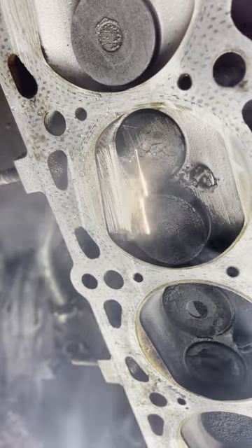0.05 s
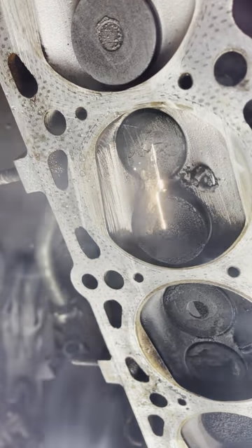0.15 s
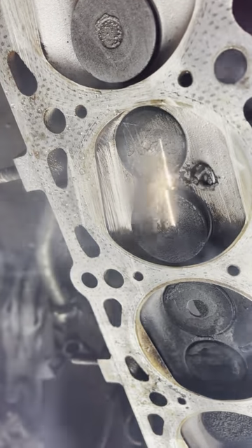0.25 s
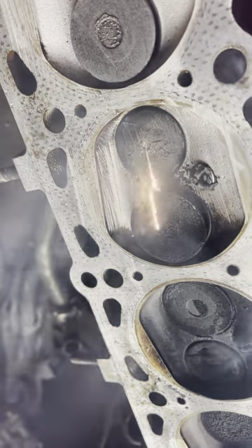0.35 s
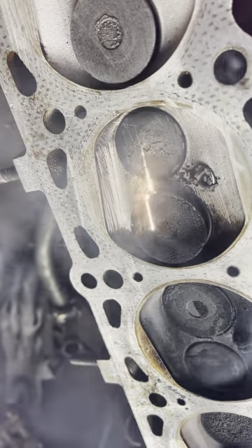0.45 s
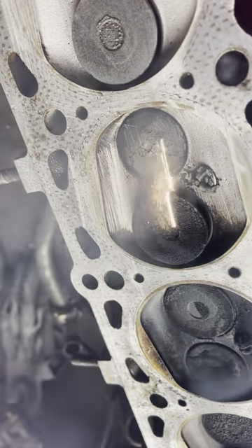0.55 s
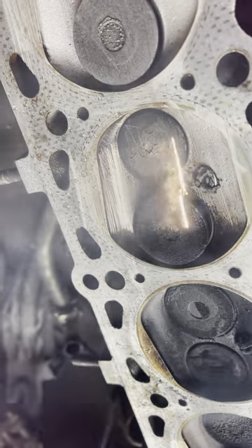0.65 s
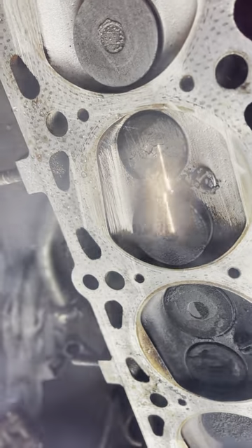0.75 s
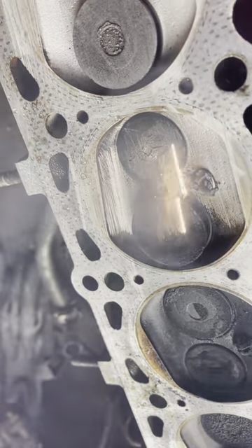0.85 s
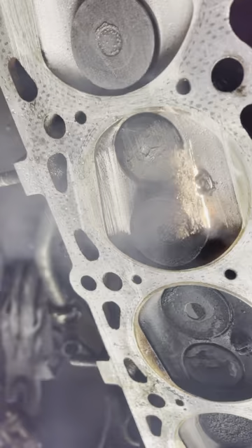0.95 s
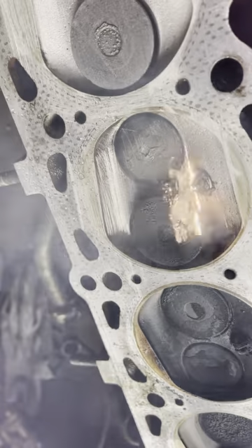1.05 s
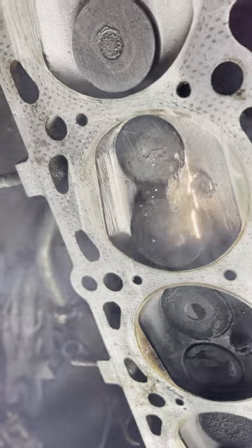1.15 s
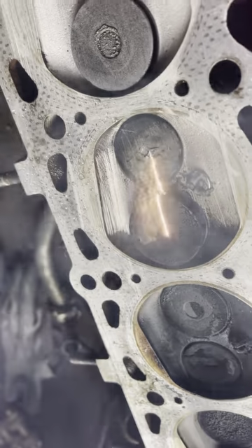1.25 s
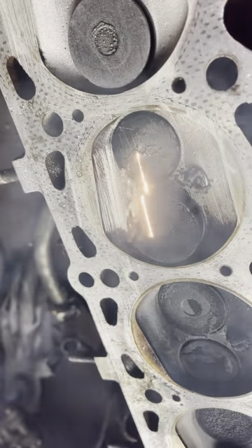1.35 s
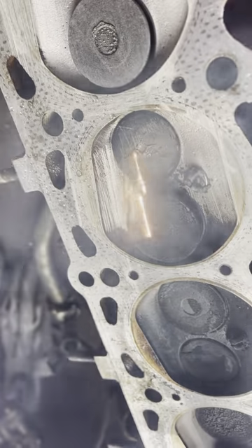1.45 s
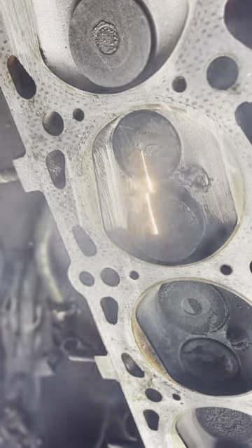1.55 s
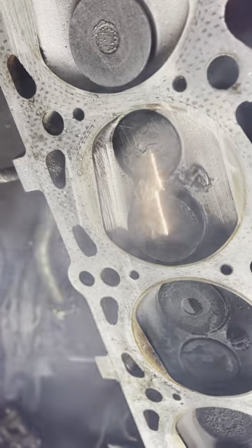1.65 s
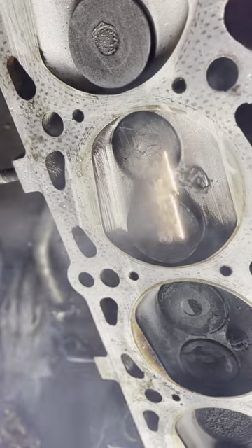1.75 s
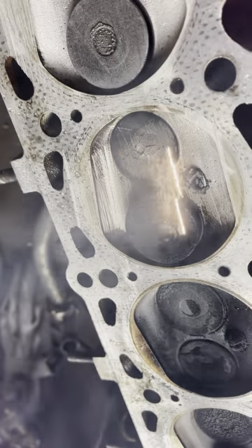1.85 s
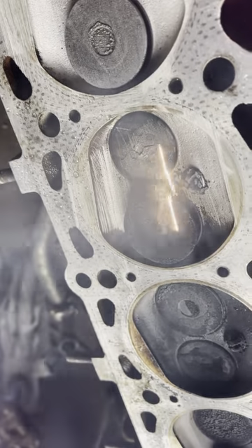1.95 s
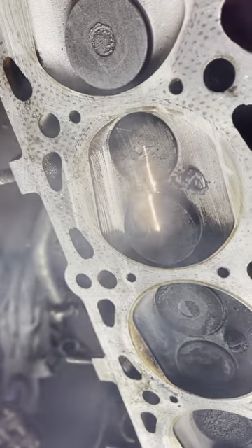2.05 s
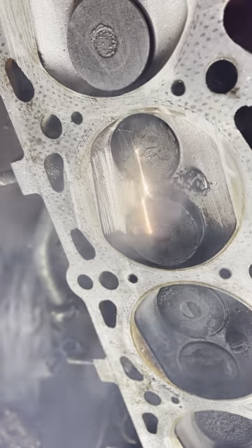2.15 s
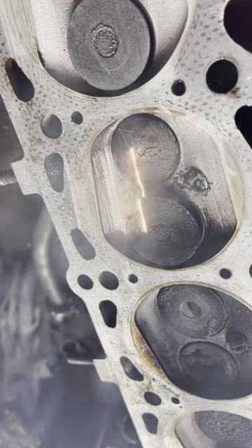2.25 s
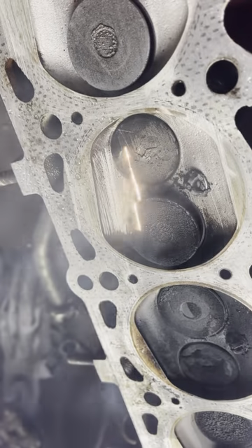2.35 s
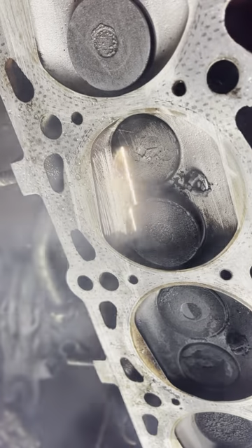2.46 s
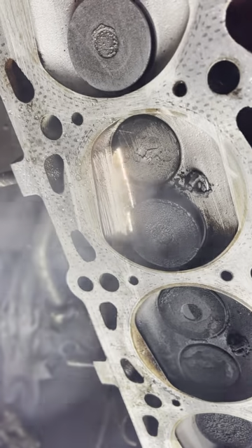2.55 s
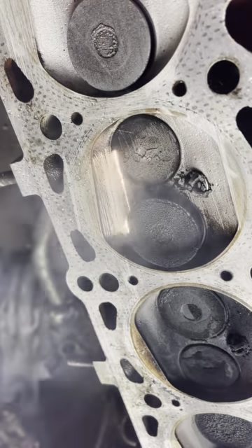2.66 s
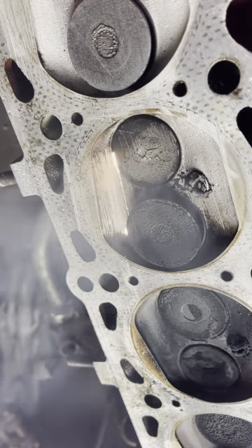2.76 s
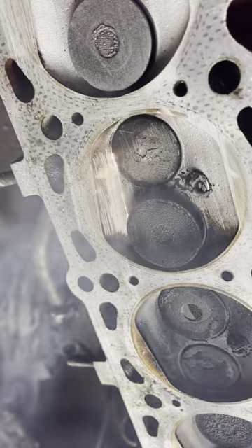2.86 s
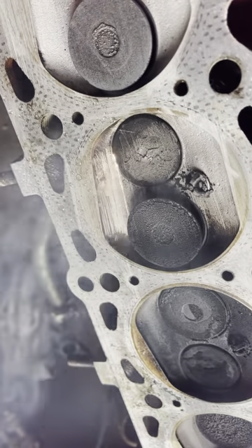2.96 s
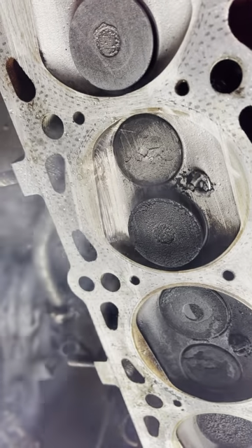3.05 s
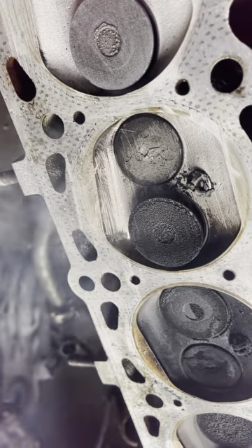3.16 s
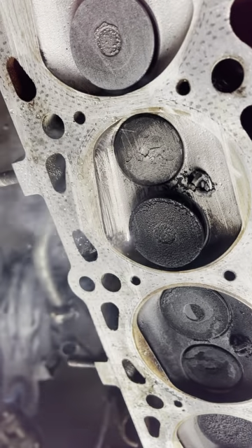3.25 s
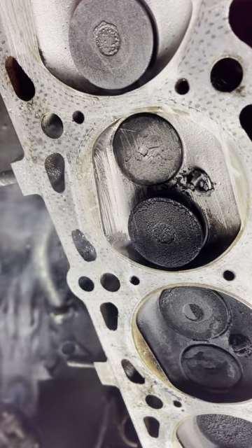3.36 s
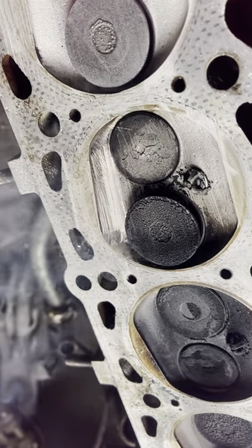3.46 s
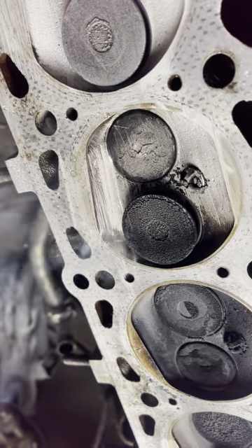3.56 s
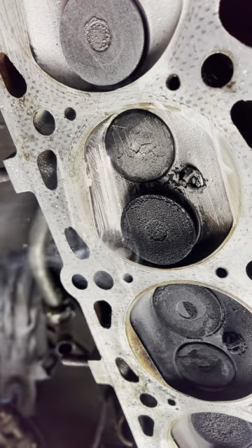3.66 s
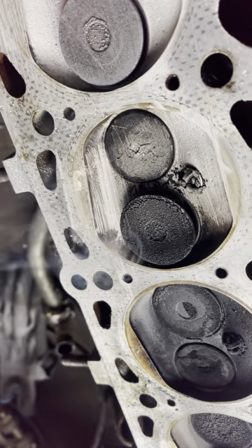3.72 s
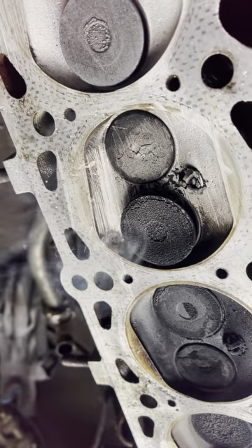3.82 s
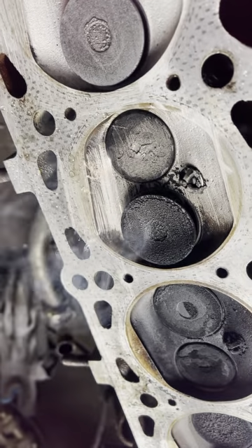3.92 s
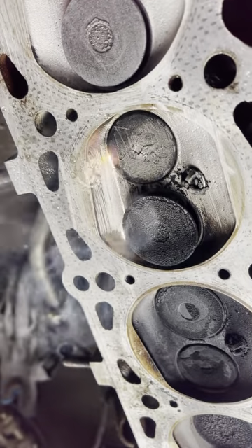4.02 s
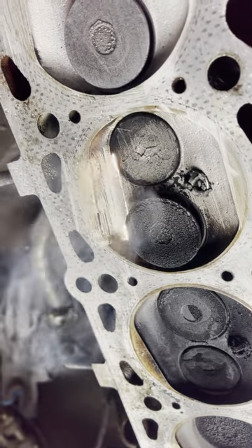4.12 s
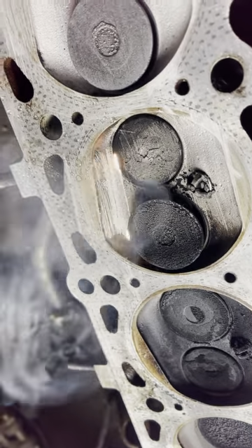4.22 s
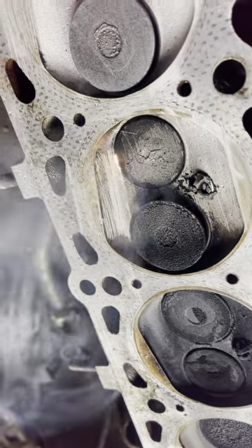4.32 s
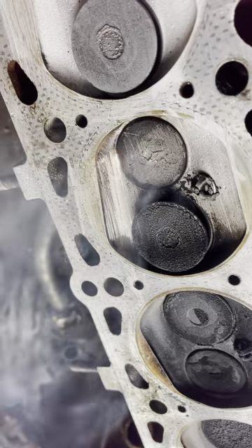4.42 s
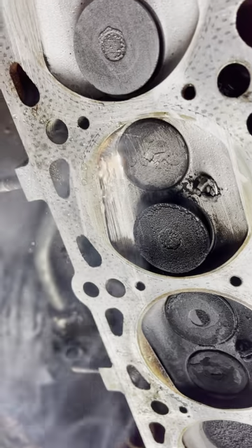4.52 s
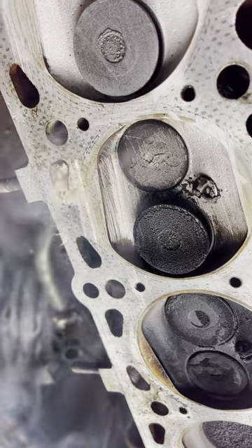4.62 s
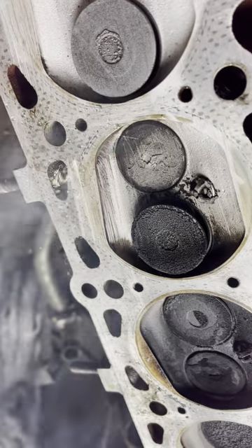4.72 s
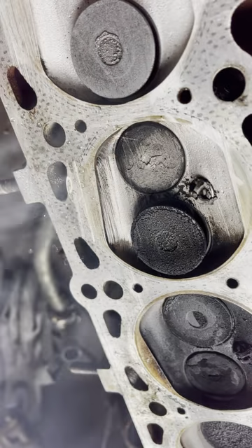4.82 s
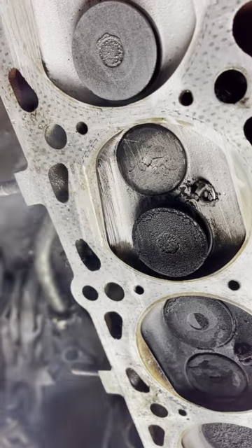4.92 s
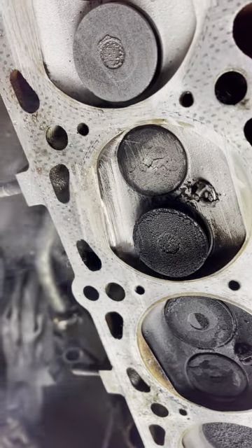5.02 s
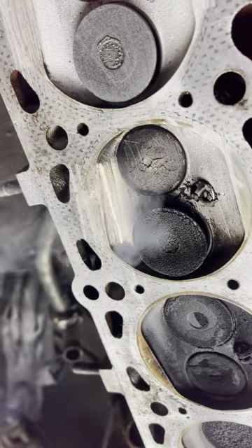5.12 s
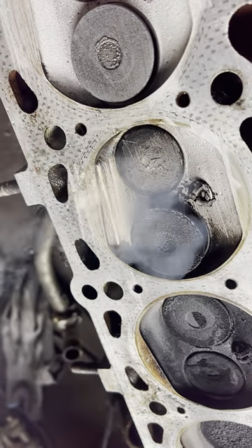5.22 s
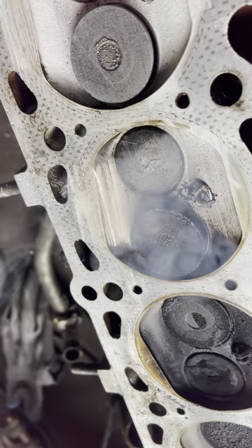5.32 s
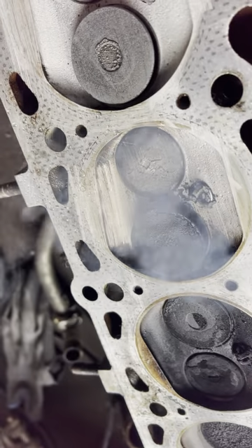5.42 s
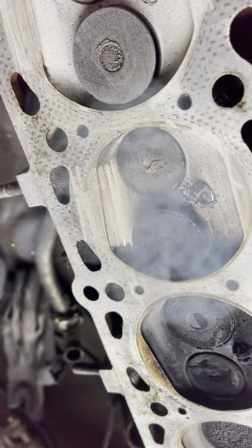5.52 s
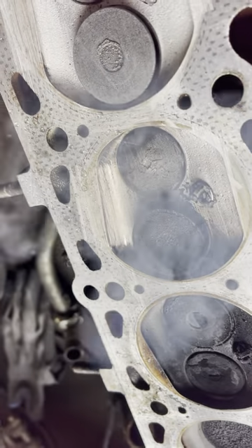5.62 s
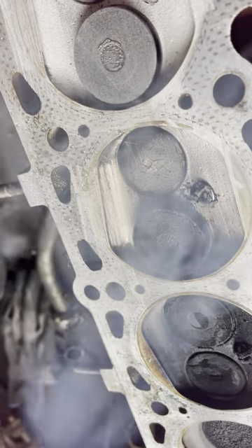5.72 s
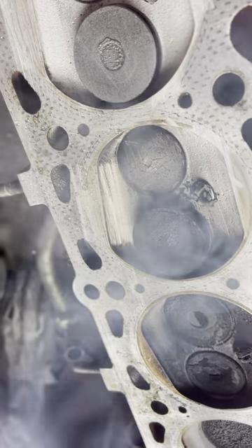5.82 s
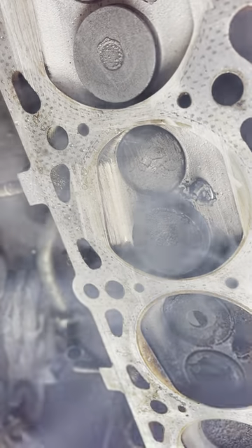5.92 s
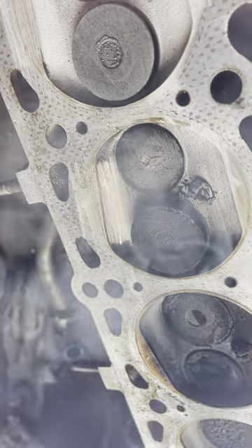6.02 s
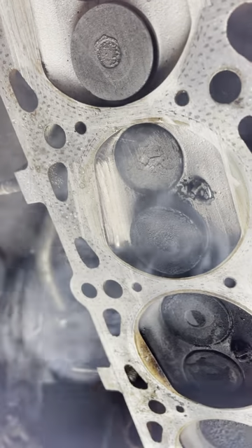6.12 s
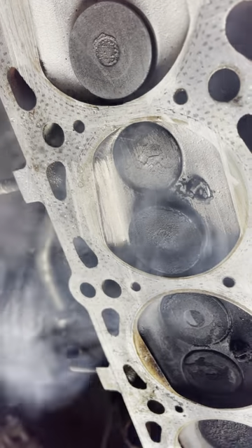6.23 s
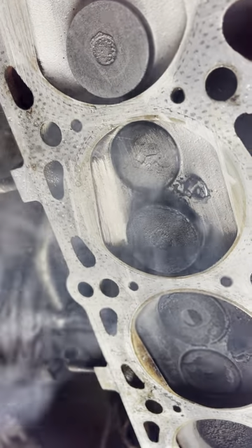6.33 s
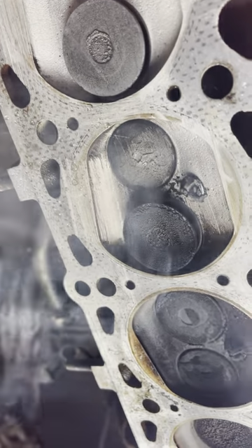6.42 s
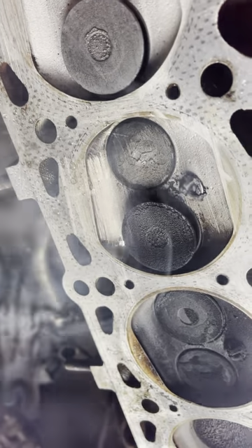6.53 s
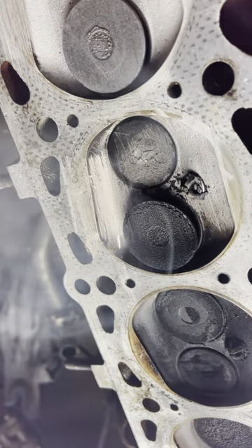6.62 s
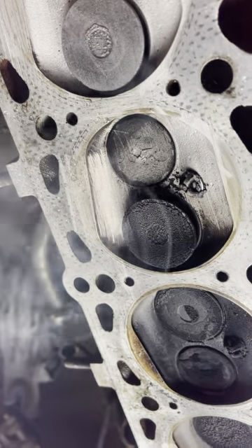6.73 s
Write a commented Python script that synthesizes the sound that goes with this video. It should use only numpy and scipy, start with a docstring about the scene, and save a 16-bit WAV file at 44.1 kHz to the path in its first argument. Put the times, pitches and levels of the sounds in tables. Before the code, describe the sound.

Harsh, continuous zapping sizzle, its high whine around ten kilohertz fluttering and briefly dipping, with a steady fast buzz underneath. It thins out near three seconds, then returns in irregular buzzing spurts, strongest a little after four seconds, followed by scattered sharp cracks and splutters over weak fizz. Close stereo microphone, tight metallic reflections, short workshop echo, very soft background rush and stirred air.

```python
"""Sizzle, whine and a buzz of snaps, close by: a pulsed laser burns carbon off an aluminium cylinder head.
A mirror sweeps the beam up and down a line 57 times a second. For three seconds an unbroken coat burns in
spurts of filtered noise; then nearly bare metal flares up on leftover patches, with single sharp cracks.
Where the line turns on carbon, a puff and a crackle snap once a sweep, which makes the buzz.
Behind lie metal and workshop echoes, a faint short tone, stirred air and a low rush."""
import sys
import numpy as np
from scipy import signal
from scipy.fft import rfft, irfft, next_fast_len
from scipy.io import wavfile
from scipy.ndimage import uniform_filter1d, map_coordinates

SR = 44100
rng = np.random.default_rng(int(sys.argv[2]) if len(sys.argv) > 2 else 0)


def waveform_to_disk(signal):
    """Save audio, clipped to [-1, 1], as 16-bit WAV at the path in sys.argv[1]."""
    frames = np.transpose(np.atleast_2d(signal))
    scaled = np.clip(frames, -1, 1) * 32767
    samples = np.round(scaled).astype(np.int16)
    wavfile.write(sys.argv[1], SR, samples)


N = 298998


def amp(db):
    """Decibels to gain."""
    return 10 ** (np.asarray(db) / 20)


def unit(x):
    """Scale to rms 1."""
    return x / np.sqrt(np.mean(x ** 2) + 1e-20)


def along(points, hz):
    """(Hz, value) points read on a log frequency axis."""
    point_hz, value = np.transpose(points)
    return np.interp(np.log(hz + 1), np.log(point_hz + 1), value)


def curves(rows):
    """One value per sample for each column after the time."""
    s, *columns = np.transpose(rows)
    return [np.interp(np.arange(N) / SR, s, column) for column in columns]


def wobble(rate):
    """A smooth random curve, rate knots a second."""
    knots = rng.standard_normal(int(N * rate / SR) + 4)
    return map_coordinates(knots, [np.arange(N) * rate / SR])


def spell(start_s, length_s, rise_s, fall_s):
    """Envelope that rises exponentially to 1 at the start, holds for its length, and dies away."""
    t = np.arange(N) / SR
    before = np.maximum(start_s - t, 0) / rise_s
    after = np.maximum(t - start_s - length_s, 0) / fall_s
    return np.exp(-np.minimum(before + after, 20))


def filtered(x, response):
    """x through a complex response of frequency."""
    m = 2 * next_fast_len(N // 2 + SR // 4)
    return irfft(rfft(x, m) * response(np.fft.rfftfreq(m, 1 / SR)), m)[..., :N]


def causal(gain):
    """The response with this gain that rings only after it is struck."""
    cepstrum = irfft(np.log(np.maximum(gain, 1e-6)))
    half = len(cepstrum) // 2
    return np.exp(rfft(np.r_[cepstrum[0], 2 * cepstrum[1:half], np.zeros(half)]))


def low_cut(hz, edge_hz):
    """Response of a second-order high-pass."""
    return (1j * hz / (edge_hz + 1j * hz)) ** 2


def lift_lows(x, lift_db, edge_hz):
    """Lift or cut the band below the edge by a moving number of dB."""
    lows = filtered(x, lambda hz: 1 / (1 + (hz / edge_hz) ** 4))
    return x + (amp(lift_db) - 1) * lows


SWEEP_HZ = 57.32
# Phase of the sweep, which steps from row to row. Each row: start in seconds, phase in cycles.
SWEEP_PHASE = [(0, .245), (1.26, .42), (4.652, .08)]


def sweep_angle():
    """The mirror's angle in its cycle: 0 at the first end of the line, pi at the second."""
    t = np.arange(N) / SR
    start_s, phase = np.transpose(SWEEP_PHASE)
    row = np.searchsorted(start_s, t, side="right") - 1
    return 2 * np.pi * (SWEEP_HZ * t - phase[row])


def per_sweep(x):
    """Even out the power, averaged over about a sweep, to rms 1."""
    sweep = round(SR / SWEEP_HZ)
    power = uniform_filter1d(x ** 2, sweep)
    return x / np.sqrt(np.abs(uniform_filter1d(power, sweep)) + 1e-12)


def surface(repeat):
    """Noise that partly repeats, as the beam crosses the same rough spots in each sweep."""
    hz = np.fft.rfftfreq(N, 1 / SR)
    r = np.clip(along(repeat, hz), 0, .985)
    comb = np.sqrt(1 - r ** 2) / (1 - r * np.exp(-2j * np.pi * hz / SWEEP_HZ))
    return unit(irfft(rfft(rng.standard_normal(N)) * comb, N))


def spurts(rate, size_db, life_ms):
    """Envelope of bursts that flare at once and die out: rate a second, size spread in dB, power life in ms."""
    sizes = amp(2 * size_db * np.clip(rng.standard_normal(N), -2, 2))
    flares = (rng.random(N) < rate / SR) * sizes
    power = signal.lfilter([1], [1, -np.exp(-1000 / (life_ms * SR))], flares)
    return unit(np.sqrt(power))


# The unbroken coat burning. Each row: time in seconds, hiss in dB, whine in dB before COAT_WHINE_TRIM_DB.
COAT_LEVELS = [(0.0, -33, -19.5), (0.19, -34, -30), (0.25, -34.5, -22), (0.53, -35.5, -24.5),
               (1.0, -32.5, -20.5), (1.01, -31, -27.5), (1.23, -29.5, -19), (1.3, -32.5, -24.5),
               (1.73, -37, -23), (1.77, -35.5, -29.5), (1.99, -35, -20.5), (2.02, -37.5, -31.5),
               (2.17, -36, -23.5), (2.62, -36.5, -28), (2.68, -38.5, -49), (2.75, -39, -33.5),
               (3.03, -37, -31), (3.05, -40, -28.5)]
# The faint film left on cleaned metal. Each row: time in seconds, hiss in dB.
FILM_LEVELS = [(3.1, -47.5), (3.42, -53.5), (3.9, -53), (4.85, -50), (5.05, -47), (6.0, -48), (6.75, -48)]
# Leftover patches flaring up. Each row: start in seconds, length in seconds, hiss in dB,
# whine over the hiss in dB, lift of the lows in dB.
PATCH_FLARES = [(3.143, 0.1, -59.5, 15, 5), (3.274, 0.086, -55, 14.5, 10), (3.463, 0.047, -39.5, 7, -12),
                (3.58, 0.068, -40, -3, -16), (3.675, 0.044, -39, 6, -14), (3.953, 0.099, -44.5, 6, -14),
                (4.081, 0.17, -32.5, 3.5, 11), (4.27, 0.16, -37, 10.5, 7), (4.445, 0.033, -46.5, 12, 0),
                (4.499, 0.16, -37, 10, 5), (4.654, 0.076, -41.5, 3.5, 3), (4.906, 0.024, -41, 8.5, -6),
                (5.067, 0.076, -41, 9, 14), (5.152, 0.11, -34, 10.5, 7), (5.278, 0.061, -39, 5.5, 11),
                (5.344, 0.17, -40, 11, 8), (5.514, 0.051, -39.5, -1, 10), (5.606, 0.081, -37, 9.5, 6),
                (5.697, 0.093, -41.5, 13, 5), (5.823, 0.05, -36.5, 10.5, 7), (5.897, 0.043, -36.5, 9, 5),
                (5.977, 0.034, -44, 6.5, -2), (6.056, 0.088, -39.5, 9.5, 12), (6.166, 0.056, -38.5, 10, -1),
                (6.236, 0.072, -43, 10.5, 0), (6.435, 0.02, -42, 12.5, -7), (6.616, 0.067, -45.5, 14, 16),
                (6.739, 0.052, -38.5, 11.5, -2)]
COAT_END_S, COAT_WHINE_TRIM_DB = 3.062, 1
COAT_THRUM_DB, COAT_THRUM_DB_PER_HISS_DB = -3.5, 0.58
FILM_WHINE_OVER_HISS_DB, FILM_THRUM_DB = 7.5, 5
FLARE_RISE_S, FLARE_FALL_S = 0.0034, 0.0054  # time constants
COAT_BODY_DB, BARE_BODY_DB = 1, -4.5  # lift under 2 kHz, on the coat and after it


def burning():
    """Coat, film and patches add in power: levels in dB of hiss, whine, body and thrum."""
    coat = spell(0, COAT_END_S, FLARE_RISE_S, FLARE_FALL_S)
    coat_hiss, coat_whine = curves(COAT_LEVELS)
    coat_over = coat_whine + COAT_WHINE_TRIM_DB - coat_hiss
    coat_thrum = COAT_THRUM_DB + COAT_THRUM_DB_PER_HISS_DB * (coat_hiss - coat_hiss.mean())
    fuels = [(coat * amp(coat_hiss), coat_over, coat_thrum),
             (amp(curves(FILM_LEVELS)[0]), FILM_WHINE_OVER_HISS_DB, FILM_THRUM_DB)]
    for start_s, length_s, hiss_db, over_db, lift_db in PATCH_FLARES:
        flare = spell(start_s, length_s, FLARE_RISE_S, FLARE_FALL_S)
        fuels.append((amp(hiss_db) * flare, over_db, lift_db))
    hiss = sum(gain ** 2 for gain, over, lift in fuels)
    whine = sum((gain * amp(over)) ** 2 for gain, over, lift in fuels)
    thrum_db = sum(gain ** 2 * lift for gain, over, lift in fuels) / hiss
    body_db = coat * COAT_BODY_DB + (1 - coat) * BARE_BODY_DB
    return 10 * np.log10(hiss), 10 * np.log10(whine), body_db, thrum_db


WHINE_SPLIT_HZ = 9600


def drift(whine, swing_db, rate):
    """The whine's weight wanders between its lower and upper flank."""
    lower = filtered(whine, lambda hz: 1 / (1 + (hz / WHINE_SPLIT_HZ) ** 40))
    tilt_db = swing_db * wobble(rate)
    return unit(lower * amp(tilt_db) + (whine - lower) * amp(-tilt_db))


def coloured(x, spectrum):
    """x through the causal filter of a spectrum, at rms 1."""
    return unit(filtered(x, lambda hz: causal(amp(along(spectrum, hz)))))


# Where the deposit lies. Each row: time in seconds, then lean to the first end, to both ends and
# to the outward stroke in dB before scaling by hiss_lean or whine_lean.
DEPOSIT_LEAN = [(0.08, 14.5, -2, -1), (0.27, 3, 5, -2), (0.47, 12.5, -6, 8), (0.7, 2, 1, 0),
                (0.87, 2, -6, 5), (1.02, 19, -8, 7), (1.18, 3, -4, -2), (1.35, 9, 0, 4), (1.58, 11, 1, 0.5),
                (1.78, -6, -3, -2), (2.0, 0, -5, 4), (2.2, 11.5, -4, -5), (2.45, -5, 6, 5),
                (2.7, -5.0, -7, 2), (3.0, -20, 15, -2), (3.25, -14, 13, 27), (3.5, -4, 27, 8),
                (3.85, 2, 25, 6), (4.0, -19, 15, -2), (4.2, -5, 3, 5), (4.34, -42, 15, 7),
                (4.55, -56, 19, 11), (4.64, -51, 17, 10), (4.67, -3, 12, -6), (4.75, 20, 14, -5),
                (4.95, 13, 3, -14), (5.1, -10, -13, -6), (5.22, 28, -7, 6), (5.37, 11, -10, -1),
                (5.5, 13, 5, 3.0), (5.65, 21, 15, 4), (5.9, 20.5, 0, -1), (6.08, 22, 0, 4),
                (6.22, -7, -1, 5), (6.4, -11, 21, -10), (6.6, 4, 34, -19)]
# Thickness of the deposit. Each row: time in seconds, thick share 0-1.
THICK_SHARE = [(0, 0.76), (1, 0.64), (1.2, 0.58), (1.5, 0.73), (2.4, 0.47), (2.8, 0.14), (4.6, 0.38),
               (5.2, 0.23), (6.78, 0.24)]
# Likeness of one sweep to the next. Each row: frequency in Hz, likeness 0-1.
SIZZLE_LIKENESS = [(300, 0.65), (1500, 0.41), (4000, 0.05), (10000, 0)]
# Spectrum of the hiss. Each row: frequency in Hz, relative level in dB per Hz.
HISS_SPECTRUM = [(40, -31), (170, -8), (380, -11), (560, -2), (780, -4), (980, -1), (1700, 0.5),
                 (2700, 0.5), (3700, 1), (4800, -1), (6500, 1), (8000, -5.5), (11000, 4.5), (16000, -49)]
# Broad whine of thick deposit. Each row: frequency in Hz, relative level in dB per Hz.
THICK_WHINE_SPECTRUM = [(5500, -46), (7400, -11.5), (8300, -2), (9100, -1), (9700, 6.5), (10200, 2),
                        (10900, -14), (12000, -9), (13500, -17), (16000, -25.5)]
# Whine of a thin film. Each row: frequency in Hz, relative level in dB per Hz.
THIN_WHINE_SPECTRUM = [(3500, -41.5), (5200, -14), (6400, -8), (7400, -6), (8800, -3), (9400, -2.5),
                       (10000, 3), (10700, -2.5), (11700, -3.5), (13500, -19.5), (16000, -28.5)]
THIN_FLAKES_PER_S, EXTRA_THICK_FLAKES_PER_S = 480, 1200
THIN_SIZE_DB, THICK_SIZE_DB = 2.5, 0.1  # spread: a thin film breaks up unevenly


def sizzle(angle, hiss_level, whine_level, flutter_db, swell_db, hiss_lean, whine_lean, hiss_db, whine_db):
    """Flakes burst in millisecond spurts, most where the line crosses thick deposit."""
    one_end, both_ends, outward = curves(DEPOSIT_LEAN)
    deposit = one_end * np.cos(angle) + both_ends * np.cos(2 * angle) + outward * np.sin(angle)
    thick = np.clip(curves(THICK_SHARE)[0], 0, 1)
    rate = THIN_FLAKES_PER_S + EXTRA_THICK_FLAKES_PER_S * thick
    size_db = THICK_SIZE_DB * thick + THIN_SIZE_DB * (1 - thick)
    flakes = spurts(rate, size_db, life_ms=0.4) * amp(flutter_db * wobble(170))
    hiss_envelope = (flakes + 0.25 + 1.6 * thick) * amp(hiss_lean * deposit)
    hiss = coloured(per_sweep(surface(SIZZLE_LIKENESS) * hiss_envelope), HISS_SPECTRUM)
    # thick deposit makes the whine throb harder with each sweep
    throb_db = whine_lean * (1 + 0.5 * thick) * deposit + 1.9 * wobble(300)
    whine = per_sweep(surface(SIZZLE_LIKENESS) * (flakes + 0.2) * amp(throb_db))
    thick_whine = thick * coloured(whine, THICK_WHINE_SPECTRUM)
    thin_whine = (1 - thick) * coloured(whine, THIN_WHINE_SPECTRUM)
    whine = drift(thick_whine + thin_whine, swing_db=1.13, rate=22)
    burn = amp(hiss_level + hiss_db) * hiss + amp(whine_level + whine_db) * whine
    return amp(swell_db * wobble(30)) * burn


# Carbon under an end of the line. Each row: start in seconds, length in seconds, end 1 or 2,
# level in dB before gain_db, relative push of vapour against the crackle in dB.
SNAP_SPELLS = [(0, 2.88, 1, -44, 10.5), (0, 3, 2, -36.5, 3.5), (2.78, 0.062, 1, -52, 6),
               (2.901, 0.17, 2, -34, -11), (3.095, 0.76, 1, -53.5, 7.5), (3.12, 0.15, 2, -58, -1),
               (3.286, 0.1, 2, -48.5, 3), (3.724, 0.2, 2, -50.5, -3), (3.483, 0.024, 2, -33.5, -8),
               (3.579, 0.047, 2, -30, -6), (3.673, 0.035, 2, -31, -25), (3.95, 0.052, 2, -35, -10),
               (4.007, 0.058, 2, -29.5, -10), (4.088, .21, 2, -30, 3.5), (4.089, 0.2, 1, -36.5, 8.5),
               (4.31, 0.13, 2, -27, 0.5), (4.491, 0.041, 2, -28.5, 4), (4.544, 0.02, 2, -31.5, 3),
               (4.586, 0.051, 2, -28.5, 3.5), (4.656, 0.28, 1, -49.5, 8), (5.18, 0.4, 1, -49, 3),
               (5.596, 0.35, 1, -42.5, -0.5), (6.035, 0.19, 1, -51, -6), (6.434, 0.022, 1, -33.5, -20),
               (6.485, 0.16, 2, -47, 3.5), (6.647, 0.026, 1, -39.5, -2)]
SNAP_EDGE_S = 0.0079  # time constant of the line's end sliding on or off the carbon


def snapping(which):
    """Strength of the snaps at one end of the line, and their push in dB."""
    runs = [(amp(db) * spell(start_s, length_s, SNAP_EDGE_S, SNAP_EDGE_S), push_db)
            for start_s, length_s, end, db, push_db in SNAP_SPELLS if round(end) == which]
    strength = sum(gain for gain, push_db in runs)
    return strength, sum(gain * push_db for gain, push_db in runs) / strength


# The two cracks of a snap at the second end. Each row: time in seconds, spacing in ms, later crack in dB.
CRACK_PAIRS = [(2.85, 0.84, -24), (2.93, 0.65, 0), (3.0, 0.96, -3), (3.04, 0.56, 3), (3.5, 0.43, -12),
               (3.59, 0.96, -4), (3.61, 1, -3), (3.635, 0.58, -9), (3.7, .55, -3), (3.96, 0.32, -18),
               (4.03, 0.43, -9), (4.07, 0.73, 0), (4.11, 0.66, -18), (4.35, 0.74, -22), (4.45, 0.69, -15),
               (4.55, 0.74, -22), (4.64, 0.71, -17)]


def doubled(x):
    """The beam cracks on the rim of the carbon going in and coming out; the spacing colours the snap."""
    n = np.arange(N)
    spacing_ms, second_db = curves(CRACK_PAIRS)
    second = amp(second_db)
    later = np.interp(n - spacing_ms * SR / 1000, n, x)
    return (x + second * later) / np.hypot(1, second)


WALL_MS, WALL_SWING_MS, WALL_KNOTS_PER_S, WALL_DB = 0.99, 0.206, 14, -13.5


def wall(x):
    """The hollow's side adds an echo whose delay wanders with the spot, so the colour shifts."""
    n = np.arange(N)
    delay_ms = WALL_MS + WALL_SWING_MS * wobble(WALL_KNOTS_PER_S)
    return x + amp(WALL_DB) * np.interp(n - delay_ms * SR / 1000, n, x)


# Spectrum of a snap. Each row: frequency in Hz, relative level in dB per Hz.
SNAP_SPECTRUM = [(30, -19), (115, -15), (230, -8.5), (370, -13.5), (470, 0), (780, 1), (950, 4), (1250, 1),
                 (1600, 6), (2500, -1), (4000, 5.5), (5000, -0.5), (6600, 13.5), (8600, 4.5), (13000, -6),
                 (16000, -23)]
# The ring that each snap carries. One row: centre in Hz, width in Hz, height in dB.
SNAP_RING = (10160, 1170, 16)


def snap_colour(hz):
    """Response of the hollow in the metal to a sharp burst."""
    centre_hz, width_hz, ring_db = SNAP_RING
    ring = amp(ring_db) / (1 + (2 * (hz - centre_hz) / width_hz) ** 2)
    return causal(amp(along(SNAP_SPECTRUM, hz)) + ring)


# Likeness of one snap to the next. Each row: frequency in Hz, likeness 0-1 (capped just below 1).
SNAP_LIKENESS = [(300, 1), (1500, 0.89), (4000, 0.78), (10000, 0.41)]
CRACKLE_LOW_HZ = 360


def snaps(angle, which, rise_ms, dwell_ms, scatter_db, gain_db):
    """At each turn the beam dwells on one spot: a push of vapour and a short crackle."""
    strength, push_db = snapping(which)
    ms_from_turn = ((angle + np.pi) % (2 * np.pi) - np.pi) / (2 * np.pi * SWEEP_HZ) * 1000
    dwell = np.exp(-np.abs(ms_from_turn) / np.where(ms_from_turn < 0, rise_ms, dwell_ms))
    crackle = per_sweep(surface(SNAP_LIKENESS) * dwell)
    if which == 2:
        crackle = doubled(crackle)
    crackle = filtered(crackle, lambda hz: low_cut(hz, CRACKLE_LOW_HZ))
    at_turn = (ms_from_turn[:-1] < 0) & (ms_from_turn[1:] >= 0)
    turns = np.r_[0, at_turn] * np.sqrt(SR / SWEEP_HZ)
    puff = 1.4 * filtered(turns, lambda hz: 1 / (1 + 1j * hz / 1300) ** 2)
    # the push varies from spot to spot, so some snaps are dull and others dry
    burst = wall(crackle + amp(push_db + 1.2 * wobble(40)) * puff)
    return unit(filtered(burst, snap_colour)) * strength * amp(gain_db + scatter_db * wobble(50))


# Single sharp cracks and short splutters, many of them at the line's turns.
# Each row: start in seconds, level in dB before gain_db, life in ms.
SINGLE_CRACKS = [(3.273, -21, .3), (3.288, -22, .56), (3.307, -17, 0.21), (3.487, -14.5, 0.5),
                 (3.504, -16, .36), (3.574, -18, .4), (3.609, -19, .37), (3.644, -13, 0.27),
                 (3.679, -11, 0.29), (3.713, -11.5, .4), (3.94, -17.5, 0.27), (3.958, -11.5, 0.28),
                 (4.063, -12, 0.71), (4.08, -3.5, 0.58), (4.097, -5, 1.4), (4.271, -9, 0.63),
                 (4.323, -7.5, .32), (4.481, -11.5, .5), (5.179, -6.5, .72), (5.198, -7, 2),
                 (5.217, -7.5, 2.3), (5.354, -13, .8), (5.371, -14.5, .8), (5.406, -14, .6),
                 (5.424, -10.5, .8), (5.442, -6, 3.4), (5.495, -16, 1.1), (5.6, -14, .5), (5.634, -7, 2),
                 (5.652, -10, 2), (5.687, -11.5, 0.81), (5.768, -18, .3), (5.775, -17, 0.27),
                 (5.828, -10, 1), (5.896, -11, 2.7), (5.914, -6.5, 3.1), (5.948, -10, 1.4),
                 (6.011, -19, .3), (6.036, -13, 0.7), (6.055, -16, 1.2), (6.07, -7.5, 2.1),
                 (6.176, -16, 1.3), (6.186, -14, .3), (6.195, -7.5, 1.9), (6.212, -12, 0.8),
                 (6.254, -15.5, 2.2), (6.271, -14, .5), (6.318, -18, .25), (6.337, -17, 0.33),
                 (6.431, -17, .5), (6.456, -10.5, .3), (6.514, -18, 0.48)]
SINGLE_CRACK_LOW_HZ = 720
SPLUTTER_BURSTS_PER_S, SPLUTTER_SIZE_DB, SPLUTTER_LIFE_MS = 2700, 1, 0.24


def single_cracks(gain_db):
    """Decaying bursts of spurting noise: sharp, thin cracks if short-lived, splutters if longer."""
    cracks = np.zeros(N)
    ms = np.arange(SR // 100) / SR * 1000
    envelope = spurts(SPLUTTER_BURSTS_PER_S, SPLUTTER_SIZE_DB, SPLUTTER_LIFE_MS)
    splutter = rng.standard_normal(N) * envelope
    for start_s, db, life_ms in SINGLE_CRACKS:
        first = round(start_s * SR)
        crack = splutter[first:][:len(ms)] * np.exp(-ms / life_ms)
        cracks[first:][:len(ms)] += amp(db + gain_db) * crack / np.linalg.norm(crack)
    return filtered(cracks, lambda hz: snap_colour(hz) * low_cut(hz, SINGLE_CRACK_LOW_HZ))


# Brief dips in the burning sound. Each row: start in seconds, end in seconds, level in dB.
LEVEL_DIPS = [(1.253, 1.264, -15), (3.925, 3.936, -14), (5.583, 5.585, -3), (5.812, 5.824, -4),
              (5.88, 5.889, -5), (6.019, 6.027, -18), (6.044, 6.05, -10)]


def brief_dips():
    """Gain of the burning sound: 1, but for brief dips with smoothed edges."""
    t = np.arange(N) / SR
    dip_db = sum(db * ((t > start_s) & (t < end_s)) * 1. for start_s, end_s, db in LEVEL_DIPS)
    return amp(uniform_filter1d(dip_db, 65))


# Recesses that ring under the beam. Each row: start in seconds, length in seconds, centre in Hz, lift in dB.
RECESSES = [(2.8, 0.065, 1130, 5), (2.892, .055, 1540, -1), (3.287, 0.12, 1050, 5.5),
            (3.44, 0.07, 960, 5.5), (3.76, 0.16, 1550, 4), (4.007, 0.043, 1970, 6),
            (4.105, 0.21, 1730, 1.5), (4.576, 0.045, 900, 6)]
RECESS_Q = 5.7  # centre over width


def pockets(x):
    """A recess under the beam changes the level of its own band while the line lies in it."""
    for start_s, length_s, centre_hz, db in RECESSES:
        width_hz = centre_hz / RECESS_Q
        band = lambda hz: 1j * hz * width_hz / (centre_hz ** 2 - hz ** 2 + 1j * hz * width_hz)
        inside = spell(start_s, length_s, SNAP_EDGE_S, SNAP_EDGE_S)
        x = x + (amp(db) - 1) * filtered(x * inside, band)
    return x


# Lead of the left microphone port over the right. Each row: frequency in Hz, phase in radians.
PORT_LEAD = [(800, 0.14), (3000, 0.1), (3800, -0.67), (4900, -0.34), (5800, -1.4), (7400, -1.11),
             (7900, -0.87), (11000, 0.35), (16000, -2.1)]


def ports(x):
    """The two ports hear the same sound with opposite halves of the phase lead."""
    return filtered(x, lambda hz: np.exp(.5j * np.outer([1, -1], along(PORT_LEAD, hz))))


# Share of the sound that the casting scatters. Each row: frequency in Hz, gain in dB.
CASTING_SCATTER = [(400, -20), (1200, -16), (2800, -13), (5000, -4), (10000, -3.5)]


def casting(x, t60_s):
    """The metal hollows scatter mostly treble; the paths to each port change as the spot moves."""
    t = np.arange(SR // 50) / SR
    echoes = rng.standard_normal((2, 3, len(t))) * amp(-60 * t / t60_s)
    echoes /= np.linalg.norm(echoes, axis=-1, keepdims=True)
    treble = filtered(x, lambda hz: amp(along(CASTING_SCATTER, hz)))
    paths = signal.oaconvolve(treble[None, None], echoes, axes=-1)[..., :N]
    shares = np.array([wobble(70) for path in range(3)])
    return np.sum(paths * shares / np.linalg.norm(shares, axis=0), axis=1)


WIDTH_DB, WIDTH_SWING_DB, WIDTH_KNOTS_PER_S = -6, 10.5, 9


def widen(pair):
    """The treble image swings between narrow and broad, at roughly even loudness."""
    treble = filtered(pair, lambda hz: 1 - 1 / (1 + (hz / 7900) ** 20))
    mid, side = treble.mean(axis=0), (treble[0] - treble[1]) / 2
    width = amp(np.clip(WIDTH_DB + WIDTH_SWING_DB * wobble(WIDTH_KNOTS_PER_S), -12, 6))
    even = np.sqrt(1.0 / (1 + 0.45 * width ** 2))
    return pair - treble + even * (mid + np.outer([1, -1], width * side))


# Workshop echo. Each row: frequency in Hz, t60 in seconds.
ROOM_DECAY = [(200, 0.14), (2000, 0.06), (10000, 0.039)]


def workshop(x):
    """A short diffuse echo of decaying noise, different at each port."""
    hz, t, z = signal.stft(rng.standard_normal((2, SR // 3)), SR, nperseg=256)
    decay = amp(-60 * t / along(ROOM_DECAY, hz)[:, None])
    tail = signal.istft(z * decay, SR, nperseg=256)[1]
    return signal.fftconvolve(x[None], tail / np.linalg.norm(tail[0]), axes=1)[:, :N]


NOTE_START_S, NOTE_LENGTH_S, NOTE_EDGE_S, NOTE_HZ, NOTE_DB = 3.15, 0.095, 0.025, 1720, -65


def note():
    """A thin, slightly unsteady tone shows once the coat has gone."""
    phase = 2 * np.pi * NOTE_HZ * np.arange(N) / SR + 0.9 * wobble(110)
    swell = spell(NOTE_START_S, NOTE_LENGTH_S, NOTE_EDGE_S, NOTE_EDGE_S)
    return amp(NOTE_DB) * swell * unit(np.sin(phase))


# Puffs of air at the microphone. Each row: start in seconds, length in seconds, level in dB.
AIR_PUFFS = [(0.998, 0.034, -53), (4.107, 0.06, -61), (4.614, 0.46, -65.5), (5.193, 0.07, -57),
             (5.637, .05, -60), (5.923, 0.065, -67)]
# Spectrum of moving air. Each row: frequency in Hz, relative level in dB per Hz.
AIR_SPECTRUM = [(20, -25), (40, -4), (65, -0.5), (110, -8.5), (170, -9), (300, -19), (800, -50)]
PUFF_RISE_S, PUFF_FALL_S = 0.005, 0.015
PLUME_DB = -33.5  # relative to the burn level


def draught(burn_level, swing_db):
    """Air stirred by the smoke rumbles softly, more as more burns, and in a few puffs."""
    noise = rng.standard_normal(N) + 0.092 * rng.standard_normal((2, N))
    rumble = unit(filtered(noise, lambda hz: amp(along(AIR_SPECTRUM, hz))))
    puffs = sum(amp(db) * spell(start_s, length_s, PUFF_RISE_S, PUFF_FALL_S)
                for start_s, length_s, db in AIR_PUFFS)
    plume = amp(burn_level + PLUME_DB + swing_db * wobble(8.9))
    return np.hypot(plume, puffs) * rumble


# Spectrum of the workshop background. Each row: frequency in Hz, relative level in dB per Hz.
FLOOR_SPECTRUM = [(20, -26), (55, -14), (120, -11), (300, -16), (700, -8), (2000, -27), (8000, -33),
                  (16000, -19)]


def background(level_db):
    """The low rush of the workshop, noise that swells only slightly."""
    noise = rng.standard_normal(N) + 0.41 * rng.standard_normal((2, N))
    rush = unit(filtered(noise, lambda hz: amp(along(FLOOR_SPECTRUM, hz))))
    return amp(level_db + 1.7 * wobble(3.62)) * rush


THRUM_FLUTTER_DB, THRUM_FLUTTER_KNOTS_PER_S = 2.5, 45  # the vapour comes off in uneven gulps
PLUME_DB_PER_THRUM_DB = 0.35


def scene():
    """The burning line, heard at two ports, in the room."""
    angle = sweep_angle()
    hiss_level, whine_level, body_db, thrum_db = burning()
    thrum_db = thrum_db + THRUM_FLUTTER_DB * wobble(THRUM_FLUTTER_KNOTS_PER_S)
    laser = sizzle(angle, hiss_level, whine_level, flutter_db=1.6, swell_db=0.77,
                   hiss_lean=0.27, whine_lean=0.35, hiss_db=-0.26, whine_db=-0.5)
    # body differs between coat and bare metal; each patch has its own lift or cut of the lows
    laser = lift_lows(laser, body_db, edge_hz=1900)
    laser = laser + single_cracks(gain_db=2.0)
    laser = lift_lows(laser, thrum_db, edge_hz=480)
    laser = laser + snaps(angle, 1, rise_ms=0.22, dwell_ms=0.29, scatter_db=1.5, gain_db=1.0)
    laser = laser + snaps(angle - np.pi, 2, rise_ms=0.46, dwell_ms=0.37, scatter_db=1.0, gain_db=0.5)
    laser = pockets(laser * brief_dips())
    near = widen(ports(laser) + casting(laser, t60_s=0.025))
    air = draught(hiss_level + PLUME_DB_PER_THRUM_DB * thrum_db, swing_db=4.5)
    return near + amp(-12.5) * workshop(laser) + note() + air + background(level_db=-67.0)


TOP_HZ = 15900
LAG_MS, LAG_EDGE_HZ = 10.5, 177  # longest delay, and where it has halved


def record(dry):
    """The microphone passes lows late, so cracks end in a small falling thump; it cuts off at TOP_HZ."""
    lag = lambda hz: 2 * np.pi * LAG_MS / 1000 * LAG_EDGE_HZ * np.arctan(hz / LAG_EDGE_HZ)  # radians
    return filtered(dry, lambda hz: np.exp(-1j * lag(hz)) * (hz < TOP_HZ))


dry = scene()
out = record(dry)
waveform_to_disk(out)
```